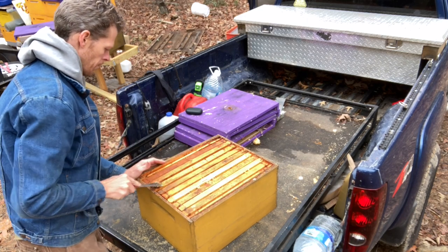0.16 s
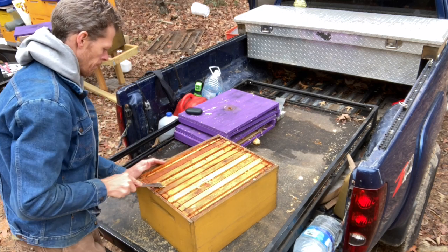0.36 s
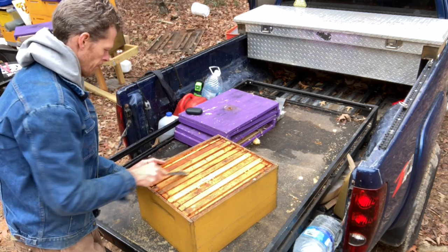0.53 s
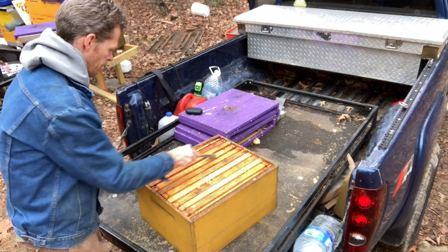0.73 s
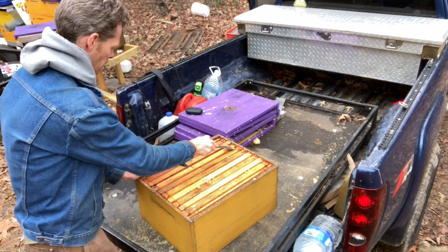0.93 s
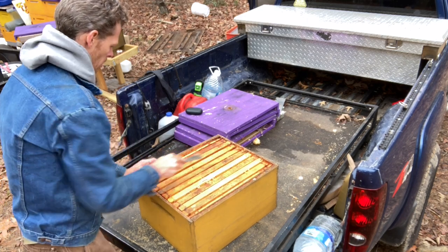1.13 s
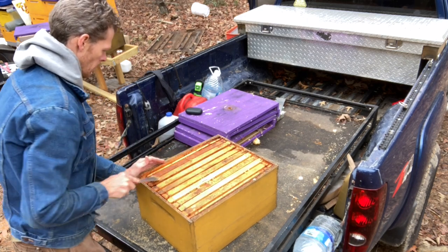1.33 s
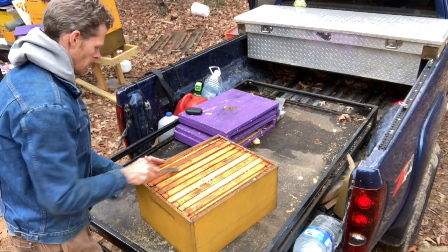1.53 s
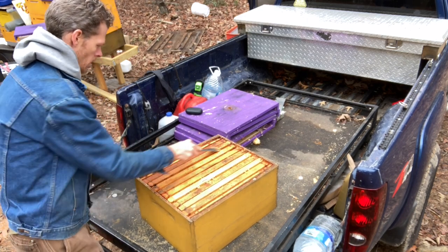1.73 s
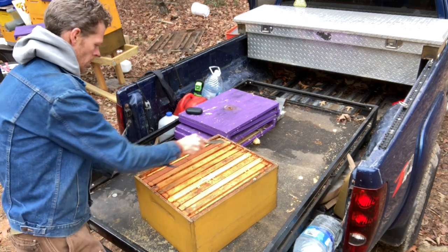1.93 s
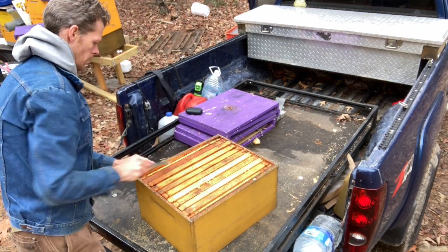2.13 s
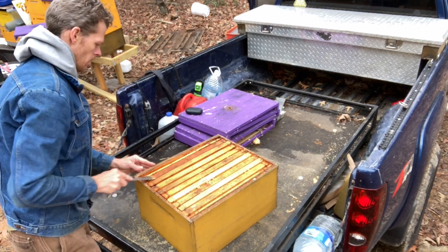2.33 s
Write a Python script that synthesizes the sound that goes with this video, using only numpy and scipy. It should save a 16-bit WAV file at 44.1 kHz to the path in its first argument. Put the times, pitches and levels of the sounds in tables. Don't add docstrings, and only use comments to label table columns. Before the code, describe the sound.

A steel scraper rasps wax off a hollow wooden box in uneven strokes, with knocks and clatter

```python
import sys
import numpy as np
from scipy import signal
from scipy.fft import rfft, irfft
from scipy.io import wavfile
from scipy.ndimage import uniform_filter1d

SR = 44100
rng = np.random.default_rng(int(sys.argv[2]) if len(sys.argv) > 2 else 0)


def output_pcm(signal):
    pcm = np.clip(np.atleast_2d(signal).T, -1, 1) * 32767
    wavfile.write(sys.argv[1], SR, np.round(pcm).astype(np.int16))


def attenuation_scalar(level_db):
    decades = np.asarray(level_db, float) / 20
    return 10 ** decades


N = 108794


def evened(x):
    return x / np.sqrt(np.mean(x ** 2) + 1e-20)


def coloured(x, points):
    f, level = np.transpose(points)
    hz = np.fft.rfftfreq(len(x), 1 / SR)
    gain = attenuation_scalar(np.interp(np.log(hz + 1), np.log(f + 1), level))
    return evened(irfft(rfft(x) * gain, len(x)))


def drift(per_s):
    n = max(int(SR / per_s), 1)
    return evened(uniform_filter1d(uniform_filter1d(rng.standard_normal(N), n), n))


def clicks(per_s, spread_db):
    chance, size = rng.random(N), rng.exponential(1, N)
    sign = rng.choice([-1., 1.], N)
    return evened(sign * (chance < per_s / SR) * attenuation_scalar(spread_db * np.minimum(size, 4)))


def resonate(x, hz, width):
    r = np.exp(-np.pi * width / SR)
    if np.ndim(hz) == 0:
        return 2 * signal.lfilter([1 - r], [1, -r * np.exp(2j * np.pi * hz / SR)], x + 1e-18).real
    turn = np.exp(2j * np.pi * np.cumsum(hz) / SR)
    return 2 * (turn * signal.lfilter([1 - r], [1, -r], x / turn + 1e-18)).real


def body(x, modes, bend=1):
    out = 0
    for k, (hz, width, db) in enumerate(modes):
        ring = resonate(resonate(x, hz * bend, width), hz * bend, 6 * width)
        out = out + (-1) ** k * attenuation_scalar(db) * ring
    return out


# (frequency [Hz], level [dB per Hz])
HISS = [(12, -33), (20, 11), (335, 6.5), (408, -1), (2570, -23), (5780, -43.5), (7230, -45), (9300, -14),
        (15800, -23)]


def air():
    hiss = coloured(rng.standard_normal(N), HISS)
    wind = resonate(resonate(rng.standard_normal(N), 35., 72.0), 35., 72.0)
    return attenuation_scalar(-51) * hiss + attenuation_scalar(-57.0 + 1.8 * drift(12)) * evened(wind)


# (time [s], rustle level [dB], low rub level [dB])
SLEEVE = [(0, -55.5, -12), (.09, -58.5, -2), (.3, -61, -4), (.42, -50, 5.5), (.92, -58, -14),
          (0.981, -50, 2), (1.12, -52, -7.5), (1.2, -48, 8), (1.3, -53, 6), (1.37, -59.5, -7),
          (1.88, -60, 2), (1.95, -51, -0.5), (2.1, -51, -5.5), (2.159, -49.5, 9), (2.25, -54, 3.5),
          (2.31, -60, 2.5)]
# (frequency [Hz], level [dB per Hz])
CLOTH = [(500, -16), (1000, 4.5), (1700, -4.5), (4000, -3), (5600, -5.5), (7300, 2.5), (9000, -8.5),
         (15800, -15.5)]
# (frequency [Hz], level [dB per Hz])
RUB = [(40, -7), (90, 5), (250, -1), (500, -1), (1100, -4.5), (2000, -20), (4000, -62)]


def sleeve():
    t = np.arange(N) / SR
    s, db, rub_db = np.transpose(SLEEVE)
    folds = clicks(4000, 0.52) * attenuation_scalar(1.6 * drift(45))
    rubs = clicks(900, 1.07) * attenuation_scalar(2.2 * drift(32))
    crackle = attenuation_scalar(np.interp(t, s, db)) * coloured(folds, CLOTH)
    return crackle + attenuation_scalar(-47.5 + np.interp(t, s, rub_db)) * coloured(rubs, RUB)


# (time [s], peak level [dB], pitch [Hz])
TICKS = [(0.0486, -25, 6000), (0.126, -38, 7160), (0.1393, -27.5, 7400), (0.181, -21, 6800),
         (0.2886, -35, 7400), (0.4186, -35.5, 7040), (0.4794, -25.5, 5850), (0.771, -19, 7400),
         (0.808, -27, 6300), (1.0187, -37, 7600), (1.1127, -43, 7030), (1.1327, -27, 6740),
         (1.1873, -36, 6700), (1.261, -33, 6700), (1.3105, -28, 3130), (1.3396, -35, 7050),
         (1.468, -28, 6700), (2.1335, -35, 6440), (2.1452, -30.5, 6050), (2.167, -34, 6170),
         (2.204, -25.5, 6600), (2.2423, -37, 6900)]


def ticks():
    tick_s = .001
    out, t = np.zeros(N + 900), np.arange(900) / SR
    for s, db, hz in TICKS:
        puff = rng.standard_normal(len(t)) * t / tick_s * np.exp(-2 * t / tick_s)
        snap = resonate(resonate(puff, hz, 900.), hz, 1800.)
        snap = snap + .4 * resonate(resonate(puff, 4800., 3200.), 4800., 3200.)
        at = round(s * SR)
        out[at:at + len(t)] += attenuation_scalar(db) * snap / abs(snap).max()
    return out[:N]


# (time [s], peak level [dB], bar pitch [Hz], crack over thud [dB])
KNOCKS = [(.050, -18.5, 369, -23), (.062, -21.5, 220.5, -49), (0.073, -33, 374, -42),
          (0.146, -21.5, 242, -23), (0.171, -22, 235, -11), (.194, -22, 406, -13.5), (1.80, -24, 655, -37),
          (0.449, -23, 245, -34), (.514, -17.5, 240, -33), (.353, -31.5, 394, -14.5), (.371, -40, 370, -30),
          (.680, -16.5, 420, -10.5), (.681, -18.5, 1060, -30), (0.686, -19.5, 416, -23),
          (0.7028, -14, 407, -15), (0.704, -20, 1100, -25), (0.759, -13, 472, -12),
          (0.7616, -12.5, 498, -25), (0.825, -13, 392, -14), (0.829, -17.5, 443, -21.5),
          (0.835, -15, 607, -21), (0.843, -23.5, 403, -21), (0.886, -21.5, 410, -28),
          (0.975, -22.5, 150, -26), (1.036, -40, 262, -30), (1.043, -34.5, 166, -32),
          (1.065, -37, 244, -30), (1.302, -27.5, 676, -1), (1.3823, -23.5, 770, -5),
          (1.386, -20.5, 394, -46), (1.389, -22.5, 995, -42), (1.438, -29, 213, -26), (1.488, -26, 557, -8),
          (1.413, -22.5, 650, -15), (1.47, -22, 660, -18), (1.739, -21.5, 793, -24),
          (1.756, -22.5, 584, -5), (1.777, -21, 574, -18), (1.761, -21, 350, -28), (1.811, -25, 333, -33),
          (2.222, -26, 690, -21), (2.279, -20, 379.4, -15), (2.291, -23.5, 246, -20.5),
          (2.282, -28.5, 980, -37), (1.389, -31, 112, -32)]
# (frequency [Hz], level [dB per Hz])
CRACK = [(600, -2), (1800, 3.5), (2800, -5), (4400, -7), (6450, 3.5), (8500, -6.5), (15800, -41)]
# (frequency [Hz], width [Hz], level [dB])
BOX = [(110.5, 18.2, 4), (156, 26, -6), (202, 15.7, -1.5), (242, 13.7, 4.5), (318, 18, -1.5), (407, 33, 0),
       (505, 40, -7), (633, 32.5, -8), (778.5, 78, -10), (1178, 80, -14.5)]


def knocks():
    thud_s, first_s, lag_s = .0016, .00025, .0008
    crack_s, crack_rise_s = 0.003, 0.0033
    out, t = np.zeros(N + 6000), np.arange(6000) / SR
    late = np.maximum(t - lag_s, 0)
    for s, db, hz, crack_db in KNOCKS:
        a, b = rng.standard_normal((2, len(t)))
        jolts = late / thud_s * np.exp(-late / thud_s) * (0.21 + uniform_filter1d(a, size=16))
        jolts += 6.35 * (late / first_s) * np.exp(-late / first_s) / (first_s * SR)
        bar = resonate(resonate(jolts, hz, 15 + hz / 6.7), hz, 0.37 * hz)
        box = body(jolts, BOX)
        thud = bar / abs(bar).max() + attenuation_scalar(-3.5) * box / abs(box).max()
        thud = thud - resonate(thud, 0., hz) / 2
        crack = coloured(b, CRACK) + 0.48 * evened(body(b, BITE[2:]))
        crack *= (1 - np.exp(-t / crack_rise_s)) * np.exp(-t / crack_s)
        at = round(s * SR)
        out[at:at + len(t)] += attenuation_scalar(db) * (thud / abs(thud).max() + attenuation_scalar(crack_db + 10.5) * crack)
    return out[:N]


# (start [s], length [s], rms level [dB], pitch [Hz])
SINGS = [(.355, 0.041, -44.5, 413), (.47, 0.19, -45.5, 2040), (.49, 0.13, -44, 1154),
         (.50, 0.095, -38.5, 6500), (.59, 0.093, -36, 430), (.745, 0.081, -41, 1950),
         (.77, 0.046, -30.5, 487), (.815, 0.027, -47, 14000), (.82, 0.028, -41.5, 3480),
         (.86, .075, -33.5, 188), (.985, 0.047, -36, 135.4), (.99, 0.023, -39, 274),
         (1.40, 0.25, -50, 7740), (1.425, 0.046, -31.5, 208), (1.47, 0.16, -53, 6500),
         (1.54, 0.12, -42.5, 8310), (1.64, 0.1, -42, 2850), (1.68, 0.1, -37.5, 6620),
         (1.68, 0.088, -52, 14400), (1.761, 0.057, -31, 676), (1.77, 0.071, -29.5, 347),
         (1.80, 0.042, -39.5, 3620), (1.825, 0.041, -33.5, 335), (1.828, 0.047, -36.5, 740),
         (2.14, 0.085, -48, 48), (0.162, 0.07, -40.5, 1043), (1.447, 0.091, -42, 996),
         (2.39, 0.1, -42, 1575), (.56, 0.096, -36, 223), (0.858, 0.045, -36, 613), (2.41, 0.12, -41, 6340),
         (2.36, .06, -36, 276)]


def sings():
    waver, fade = .6, 0.18
    out = np.zeros(N + 9000)
    for s, length, db, hz in SINGS:
        a = rng.standard_normal(9000)
        u, width = np.arange(a.size) / (length * SR), 54 + hz / 29
        tone = evened(resonate(resonate(a, hz, width), hz, 3 * width))[::-1]
        swing = uniform_filter1d(abs(tone), size=int(2 * SR / hz) + 60)
        tone = evened(tone / (swing + waver))
        at = round(s * SR)
        out[at:at + a.size] += attenuation_scalar(db) * tone * np.clip(u / fade, 0, 1) * np.clip((1 - u) / fade, 0, 1)
    return out[:N]


# (time [s], rasp level for speed [dB],
# pressure into the box over the rasp [dB], bite over the rasp [dB])
STROKES = [
    [(.11, -63, 3, 8), (.15, -45.5, -4, -2.5), (.19, -41.5, 13, 4.5), (.22, -53.5, 20, -1.5),
     (.26, -62.5, 21.5, 7.5), (.34, -60.5, 14, 5)],
    [(.42, -61, -8, 5), (.47, -43.5, 13, -2.5), (.51, -36.5, -5.5, -3.5), (.66, -39.5, 1, 0.5),
     (.745, -41, -3, 1), (.80, -39.5, 8.5, 0.5), (.85, -48, 20.5, 10), (.905, -50, 15.5, 2.5),
     (.925, -74, 30, 14)],
    [(1.39, -51.5, 14, -10), (1.45, -41.5, 5, -8), (1.49, -35, -1, -6.5), (1.62, -36, -6.5, 2.5),
     (1.73, -37.5, -1.5, 7), (1.79, -36, 3.5, 2.5), (1.855, -48, 13.5, 2), (1.885, -78, 20, -11)],
    [(2.32, -58, 10, -7), (2.37, -45.5, 3.5, -7.5), (2.41, -35, 2.5, -9.5), (2.467, -30.5, -8, 1.5)],
]
# (frequency [Hz], level [dB per Hz])
GRIT = [(290, 10), (500, -5), (1010, 12), (1110, 13), (2710, -4), (3780, -52), (4430, -12.5), (6450, 3.5),
        (15800, -39)]
# (frequency [Hz], width [Hz], level [dB])
EDGE = [(850, 310, -2), (1160, 490, 0), (4900, 380, -4.5), (6447, 200, 3.5), (7400, 260, -1.5),
        (7840, 670, -14), (11300, 1700, -19), (14000, 1500, -26)]
# (frequency [Hz], width [Hz], level [dB])
BITE = [(1887, 670, 0), (2128, 62, -14), (2880, 590, -1), (3293, 230, -0.5), (3713, 255, -2.5)]
# (frequency [Hz], width [Hz], level [dB])
TOP = [(8100, 540, -0.5), (10570, 1400, -9), (13400, 830, -7), (14500, 1200, -8.5)]


def slips(patches_per_s):
    return clicks(5000, 2) * attenuation_scalar(3.4 * drift(patches_per_s))


def blade(modes, patches_per_s, wander_per_s):
    out = np.zeros(N)
    for mode in modes:
        ring = body(slips(patches_per_s), [mode], 1 + .011 * drift(wander_per_s))
        out += evened(ring) * attenuation_scalar(mode[2])
    return evened(out)


def strokes():
    end_s, upper_hz = 0.014, 450
    speed_share = 0.44
    t, speed, press, bite = np.arange(N) / SR, np.zeros(N), np.zeros(N), np.zeros(N)
    for table in STROKES:
        s, rasp_db, box_db, bite_db = np.transpose(table)
        ends = np.clip((t - s[0]) / end_s, 0, 1) * np.clip((s[-1] + end_s - t) / end_s, 0, 1)
        speed += ends * attenuation_scalar(np.interp(t, s, rasp_db))
        press += ends * attenuation_scalar(np.interp(t, s, rasp_db + box_db))
        bite += ends * attenuation_scalar(np.interp(t, s, rasp_db + bite_db))
    rasp = blade(EDGE, 47, 29) + attenuation_scalar(-3) * coloured(slips(53), GRIT)
    top = evened(body(slips(30), TOP, 1 + .022 * drift(19)))
    biting = attenuation_scalar(-1.5) * blade(BITE, 35, 2.8) + attenuation_scalar(-12) * top
    judders = clicks(1300, 3.0)
    deep = [m for m in BOX[1:] if m[0] < upper_hz]
    upper = [m for m in BOX if m[0] >= upper_hz]
    box = body(judders * press, deep) / np.std(body(judders, deep))
    drive = press ** (1 - speed_share) * speed ** speed_share
    box += attenuation_scalar(-2.5) * drive * evened(body(judders, upper))
    return speed * rasp + bite * biting + box


def scene():
    echo_db, echo_t60_s = -11, 0.12
    near, t = strokes() + knocks() + ticks() + sings(), np.arange(6000) / SR
    taps = rng.choice([-1., 1.], 6000) * (rng.random(6000) < .05)
    taps = taps * (t > .003) * attenuation_scalar(-60 * t / echo_t60_s)
    echo = signal.oaconvolve(near, taps / np.linalg.norm(taps))[:N]
    return (near + attenuation_scalar(echo_db) * echo + sleeve() + air())[None]


def band_limit(x):
    return signal.sosfilt(signal.butter(12, 16090, fs=SR, output="sos"), x)


# (frequency [Hz], level [dB])
MIC = [(20, -2), (8200, -2), (9500, -6.5), (15500, -3), (15900, -26), (16100, -75), (22050, -90)]


def record(dry):
    f, db = np.transpose(MIC)
    gain = attenuation_scalar(np.interp(np.fft.rfftfreq(N, 1 / SR), f, db))
    heard = irfft(rfft(dry) * gain, N)
    return band_limit(heard)


dry = scene()
out = record(dry)
output_pcm(out)
```